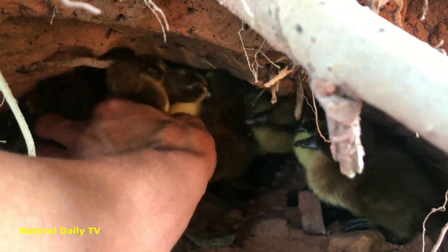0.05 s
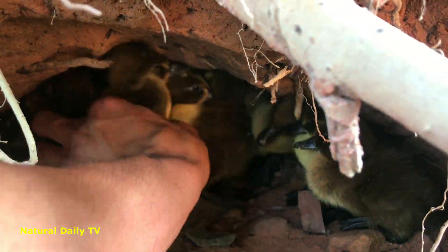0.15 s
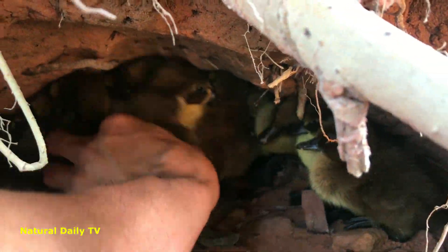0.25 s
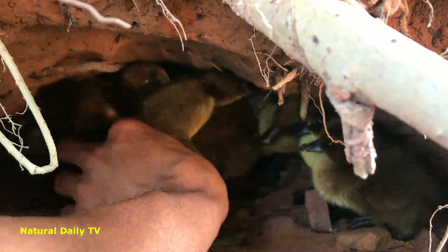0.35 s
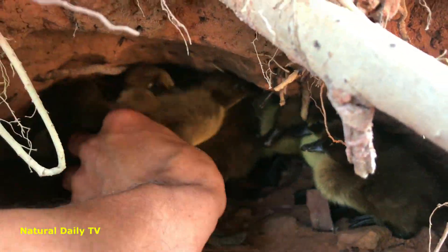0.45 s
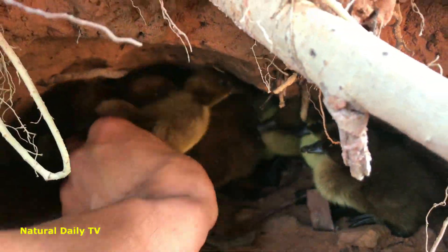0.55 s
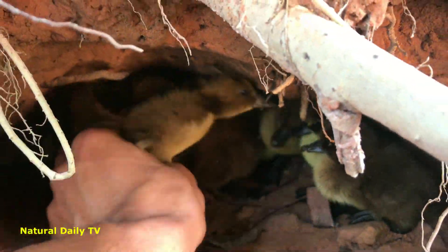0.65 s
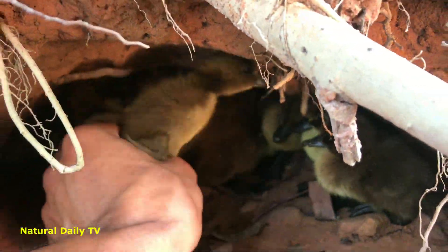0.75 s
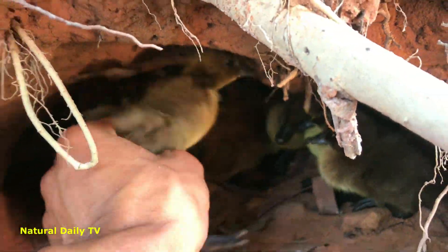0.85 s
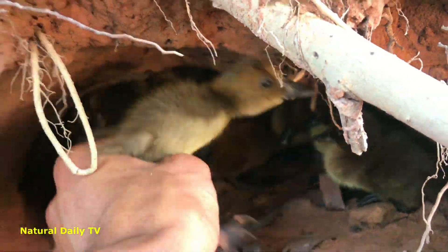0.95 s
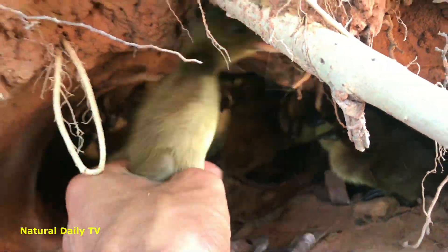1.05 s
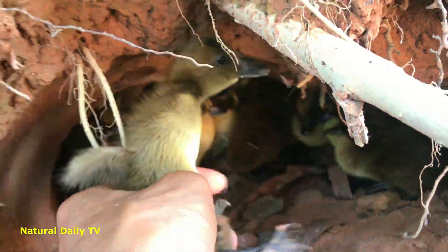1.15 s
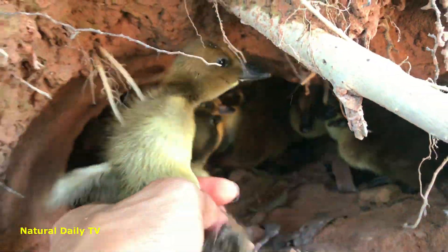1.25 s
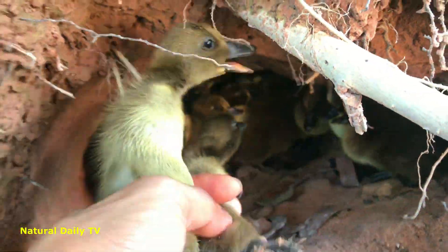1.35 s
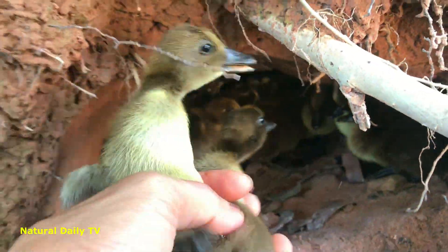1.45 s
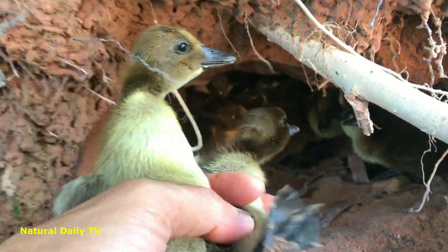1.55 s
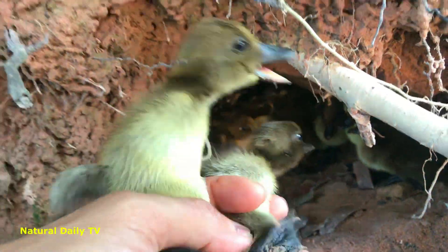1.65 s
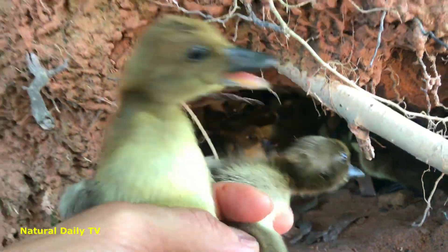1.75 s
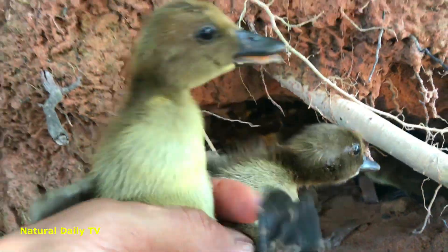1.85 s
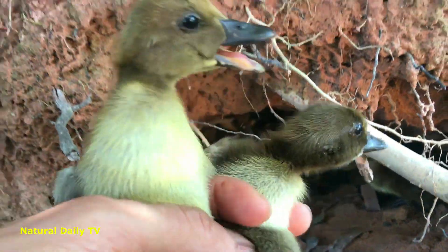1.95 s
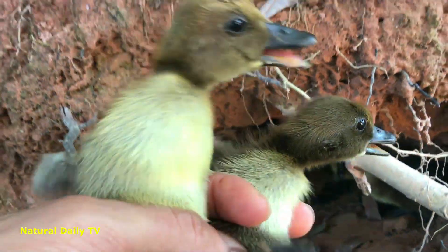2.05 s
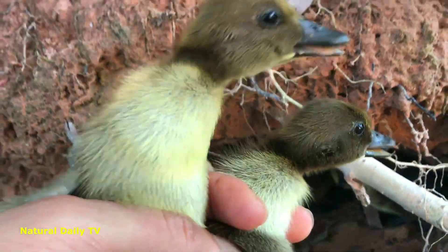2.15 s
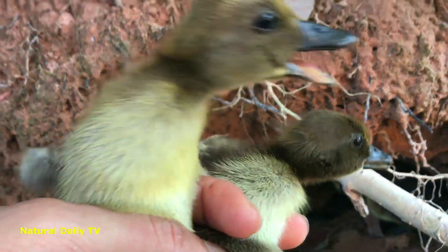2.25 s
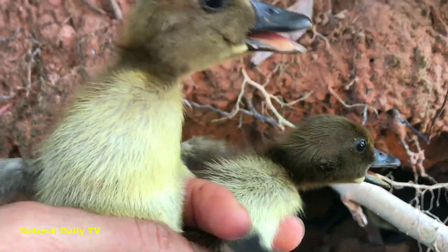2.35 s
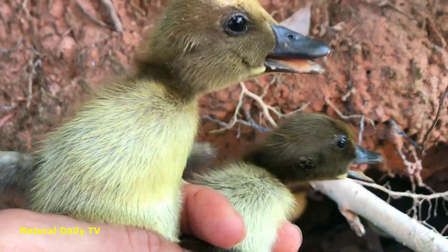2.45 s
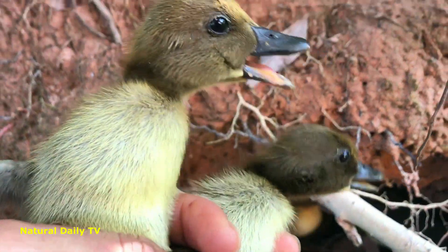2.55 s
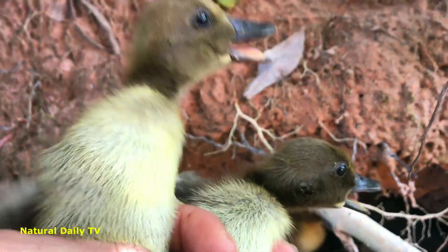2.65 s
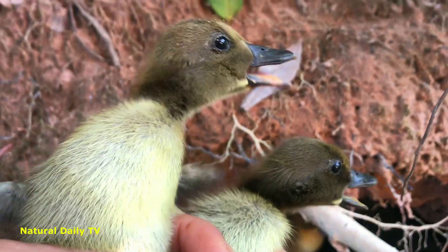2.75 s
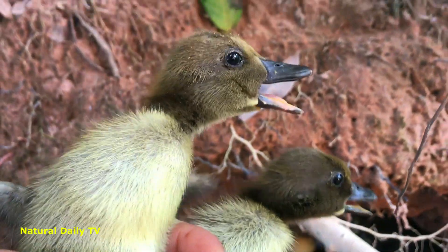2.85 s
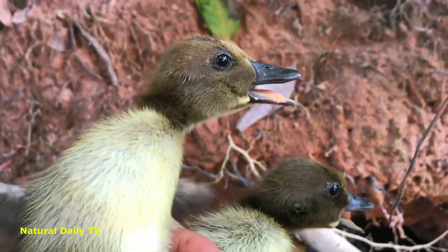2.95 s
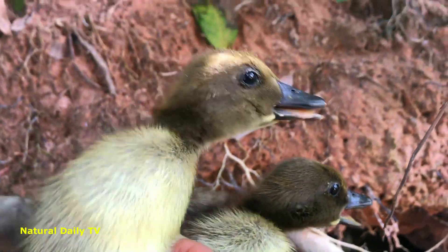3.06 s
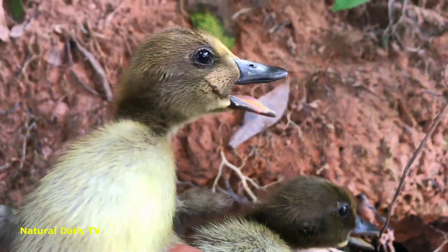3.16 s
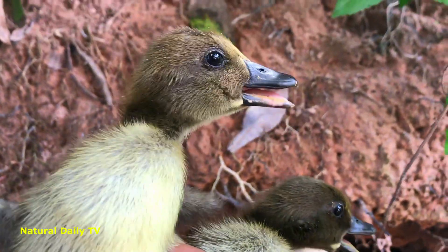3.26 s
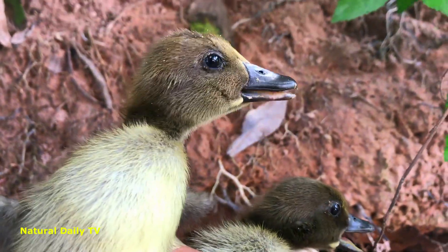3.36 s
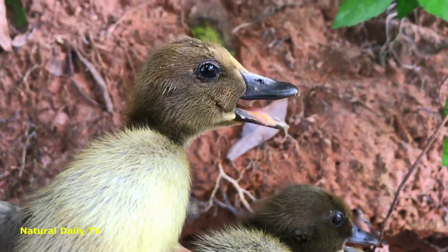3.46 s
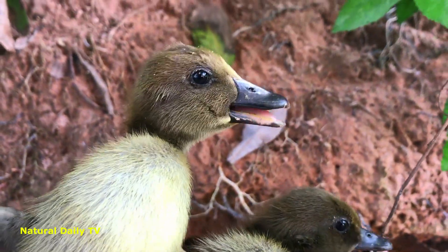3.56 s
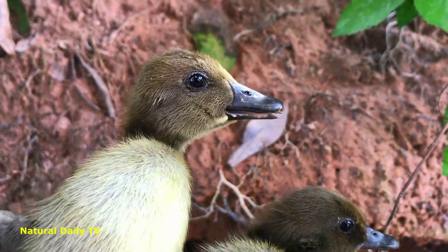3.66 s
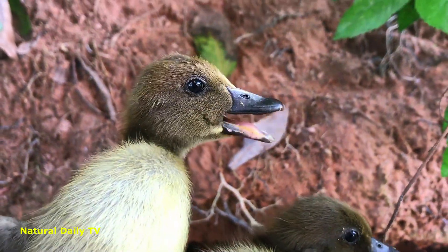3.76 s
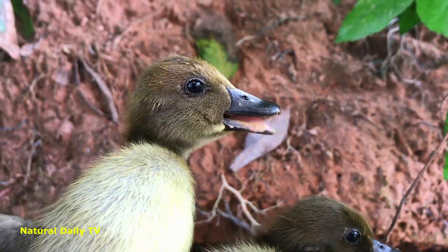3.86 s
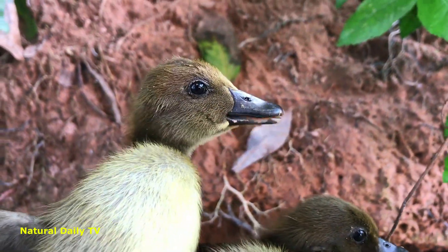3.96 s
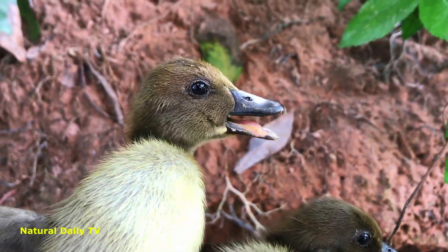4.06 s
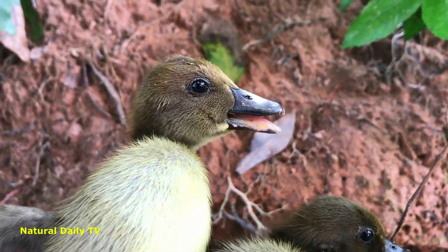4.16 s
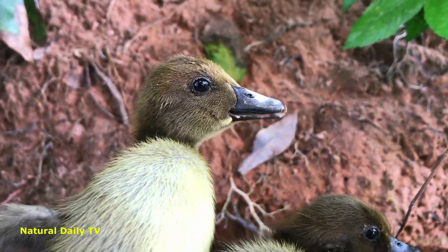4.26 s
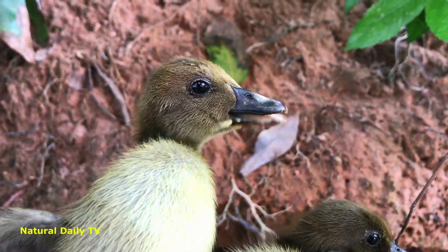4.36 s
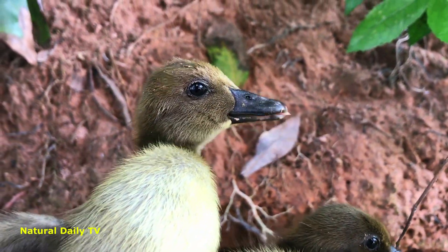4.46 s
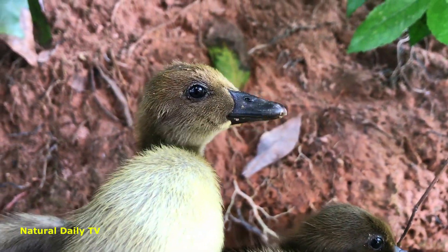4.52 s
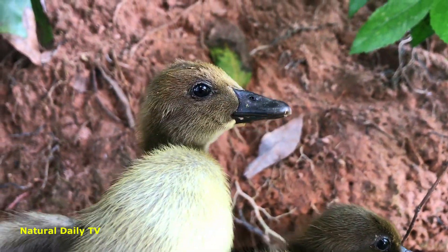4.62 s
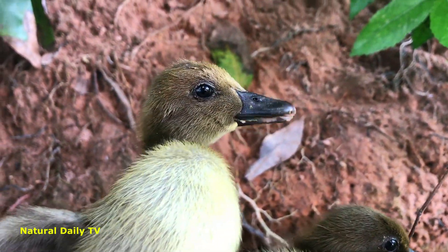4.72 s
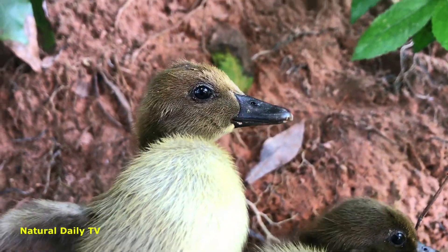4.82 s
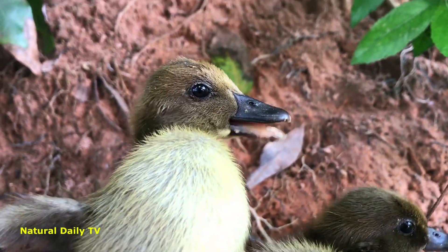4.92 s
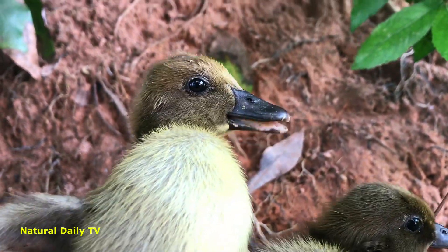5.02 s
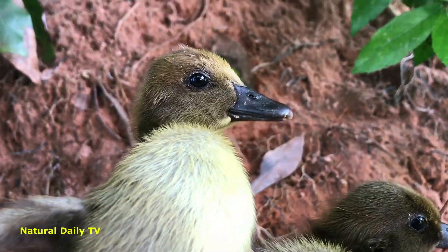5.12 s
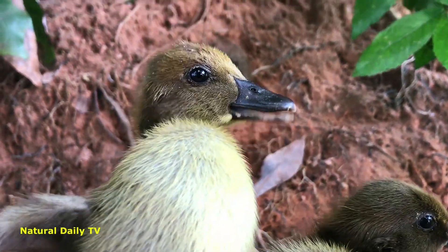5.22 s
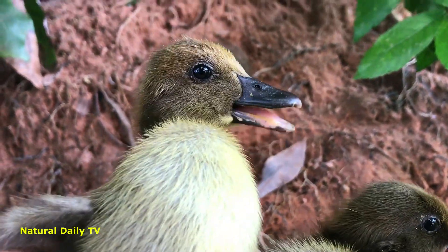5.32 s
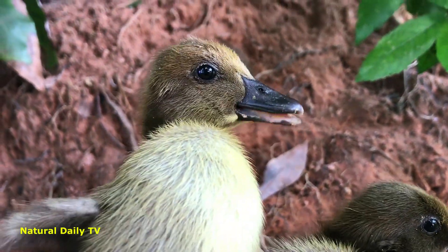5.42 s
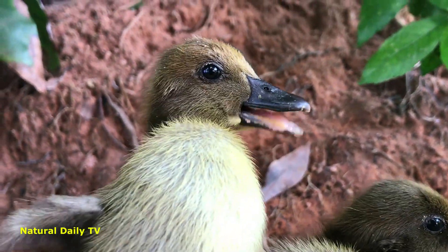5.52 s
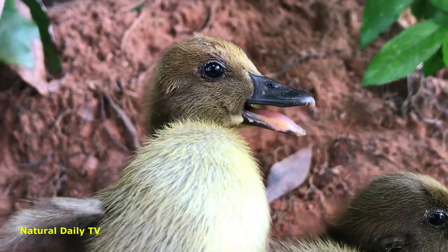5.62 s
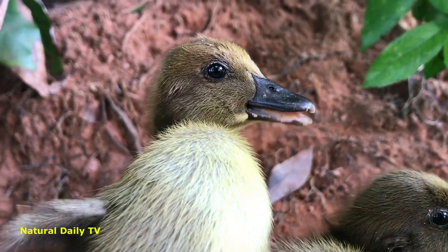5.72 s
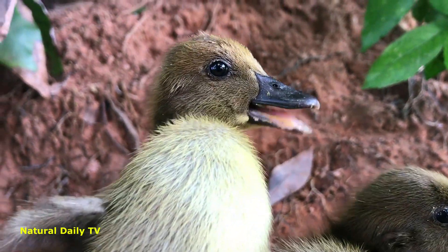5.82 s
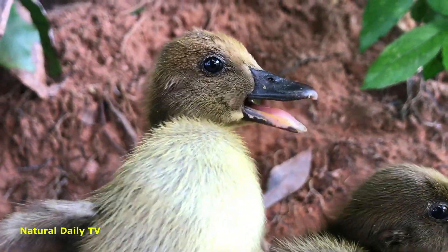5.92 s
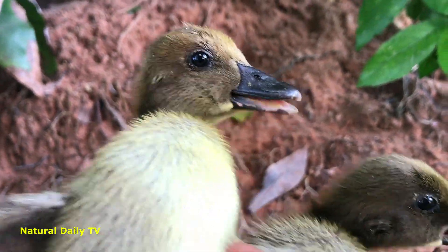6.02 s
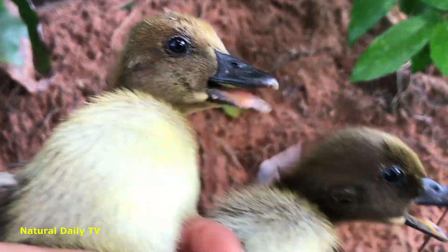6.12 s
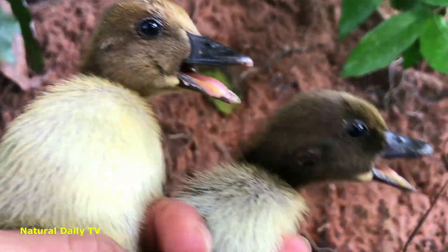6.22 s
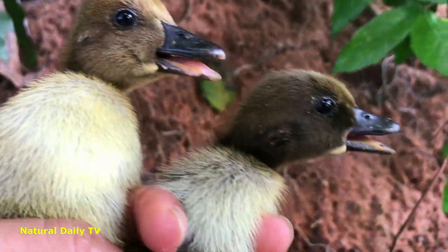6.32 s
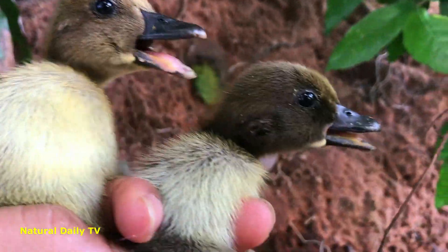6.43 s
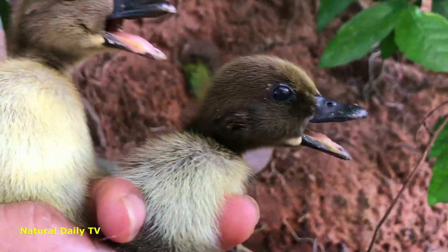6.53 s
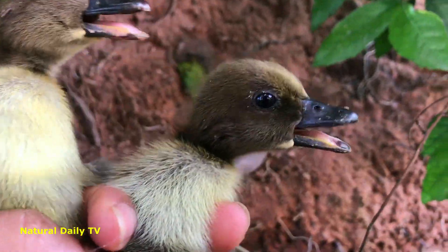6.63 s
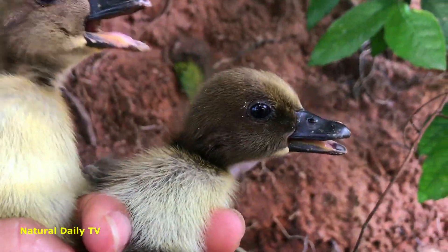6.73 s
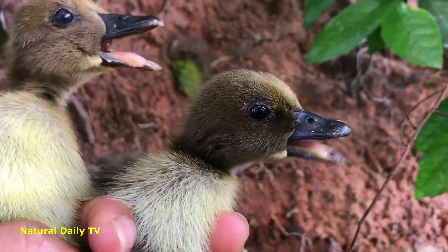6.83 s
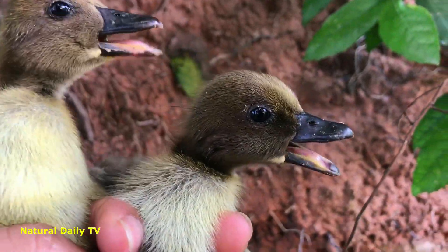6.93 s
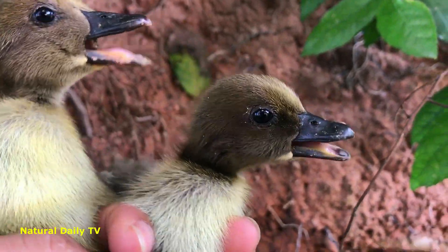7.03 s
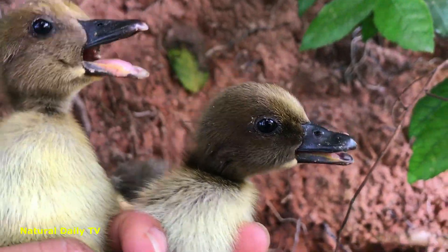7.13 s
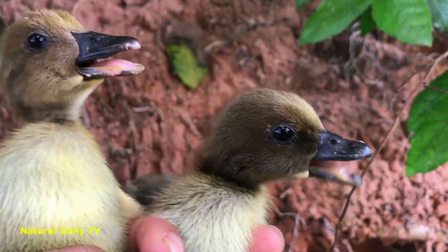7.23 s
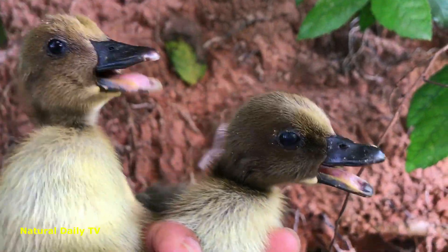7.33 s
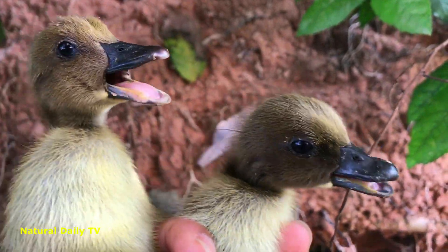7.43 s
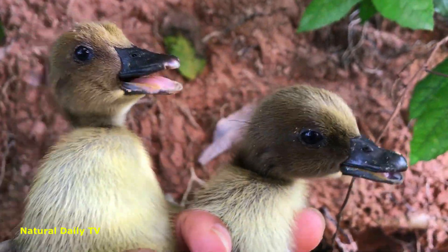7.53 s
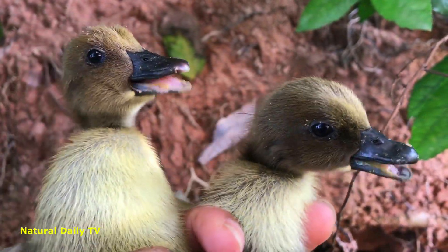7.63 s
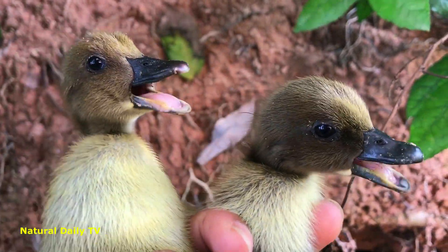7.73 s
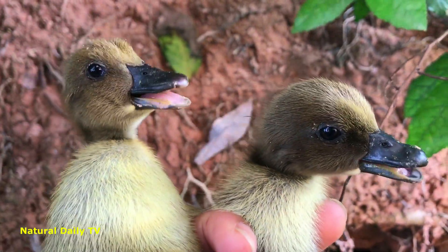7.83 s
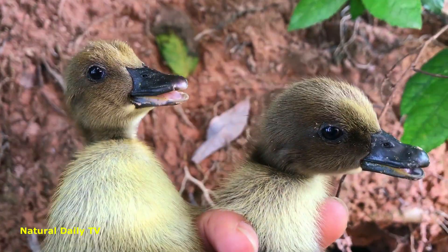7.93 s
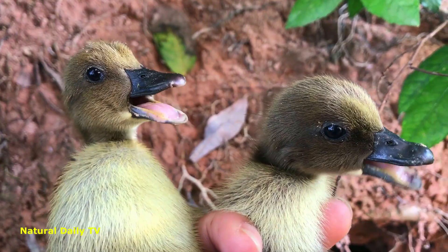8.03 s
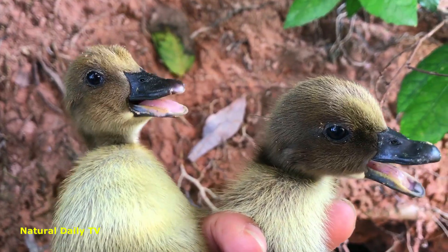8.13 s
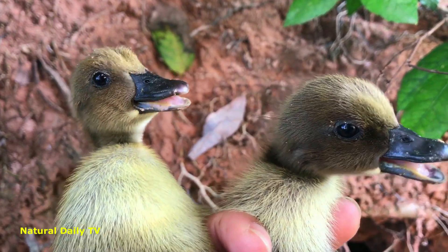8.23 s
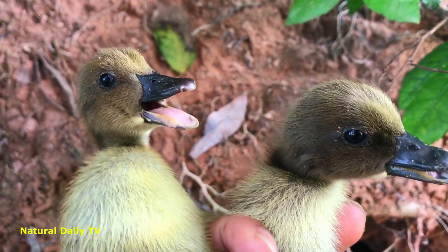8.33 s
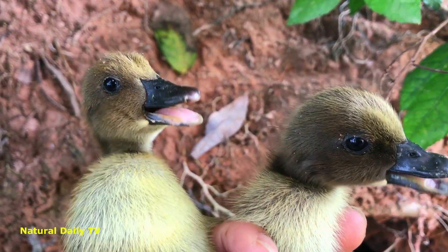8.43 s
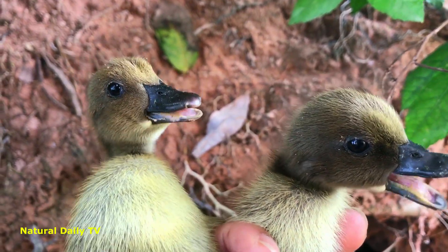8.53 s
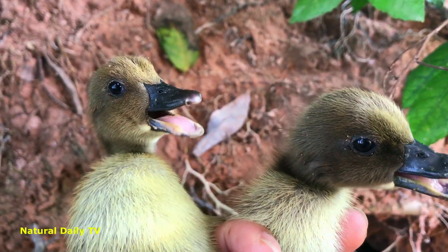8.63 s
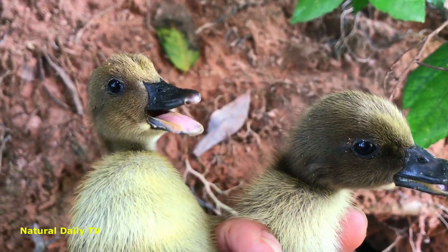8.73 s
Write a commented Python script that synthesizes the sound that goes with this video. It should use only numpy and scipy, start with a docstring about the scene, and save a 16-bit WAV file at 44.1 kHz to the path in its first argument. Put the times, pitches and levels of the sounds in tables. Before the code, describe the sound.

Soft piping from a burrow and a brush of dry soil give way to two ducklings' loud, insistent, scratchy-edged peeps.

```python
"""Two ducklings, lifted out of a burrow in an earth bank, peep close to the microphone, in turns and then
together. Each peep is a whistle with harmonics and hiss that breaks into a rasp and ends in a quick downward
slide. Others pipe softly in the burrow as sinking arches of tone, and a rising sweep made the same way leads
into the lower duckling's first peep; bills tick as short noise bursts. Shaped noise makes the open air and the
soil under a hand; the woods ring faintly, two hums waver far off, and a distant engine, a stack of firing
lines, slows and fades."""
import sys
import numpy as np
from scipy import signal
from scipy.fft import rfft, irfft
from scipy.io import wavfile
from scipy.ndimage import uniform_filter1d, map_coordinates

SR = 44100
rng = np.random.default_rng(int(sys.argv[2]) if len(sys.argv) > 2 else 0)


def put_to_file(sound):
    """Save the sound as 16-bit audio at rate SR, in the file named by the first command-line argument."""
    columns = np.atleast_2d(sound).T  # one column per channel
    safe = np.clip(columns, -1, 1)
    whole_steps = np.round(safe * 32767)
    wavfile.write(sys.argv[1], SR, whole_steps.astype(np.int16))


N = 387198
TIME = np.arange(N) / SR


def undb(db):
    """Decibels to gain."""
    return 10 ** (np.asarray(db) / 20)


def unit(x):
    """Scale to rms 1."""
    return x / np.sqrt(np.mean(x ** 2) + 1e-18)


def colour(x, points):
    """Filter by a (frequency [Hz], level [dB]) spectrum; rms 1."""
    hz, db = np.transpose(points)
    f = np.arange(len(x) // 2 + 1) * SR / len(x)
    gain = undb(np.interp(np.log(f + 1), np.log(hz), db))
    return unit(irfft(rfft(x) * gain, len(x)))


def wander(t, rate):
    """Random levels, rate a second, joined smoothly; spread near 1."""
    points = rng.standard_normal(2048)
    return map_coordinates(points, [(t - t[0]) * rate], order=2, mode="wrap")


def lumpy(x, lump_db, size=256):
    """Narrow bands swell and sink on their own for some milliseconds, as in unsteady turbulence."""
    spectrum = signal.stft(x, nperseg=size)[2]
    lumps = rng.standard_normal(spectrum.shape)
    lumps = uniform_filter1d(lumps, size=3, axis=0)
    lumps = unit(uniform_filter1d(lumps, size=4, axis=1))
    spectrum = spectrum * undb(lump_db * np.clip(lumps, -2, 2))
    return unit(signal.istft(spectrum, nperseg=size)[1][:len(x)])


def gate(t, on, off, rise, fall):
    """Smooth opening centred on one moment and closing centred on another."""
    return (1 + np.tanh((t - on) / rise)) * (1 - np.tanh((t - off) / fall)) / 4


def span(start, end):
    """The samples of a call, with a 20 ms margin on each side."""
    return slice(max(int((start - .02) * SR), 0), min(int((end + .02) * SR), N))


def tone(phase):
    """Sine of rms 1."""
    return np.sqrt(2) * np.sin(phase)


def turn(hz):
    """Phase of a moving pitch."""
    return 2 * np.pi * np.cumsum(hz) / SR


def reedy(phase, second_db, third_db):
    """A tone with its second and third harmonics."""
    return tone(phase) + undb(second_db) * tone(2 * phase) + undb(third_db) * tone(3 * phase)


# open-air spectrum: (frequency [Hz], relative level [dB per Hz])
AIR_SPECTRUM = [(20, -20), (45, 0), (65, 3.5), (120, 1), (200, -8.5), (450, -14.5), (900, -14.5),
                (2000, -24), (4000, -17), (8000, -29.5), (16000, -48)]
AIR_START_DB, AIR_DB_PER_S = -58, -0.48


def open_air():
    """Coloured noise that wavers and grows slowly quieter."""
    level_db = AIR_START_DB + AIR_DB_PER_S * TIME + wander(TIME, 6.0)
    return colour(rng.standard_normal(N), AIR_SPECTRUM) * undb(level_db)


# faint far-off hums: (frequency [Hz], level [dB])
HUMS = [(570, -82), (820, -80)]


def far_hums():
    """Tones unsteady in pitch, slowly wavering in level."""
    out = np.zeros(N)
    for hz, db in HUMS:
        phase = turn(hz * (1 + 0.01498 * wander(TIME, 40)))
        out += undb(db + 1.9 * wander(TIME, 2.424)) * tone(phase)
    return out


ENGINE_START_HZ, ENGINE_IDLE_HZ, ENGINE_SLOWING_S = 140.7, 90.7, 2.9
ENGINE_NEAREST_DB, ENGINE_PASSES_S, ENGINE_NEAR_S = -59, 1.5, 1.3


def far_engine():
    """Firing lines sink towards idle; loudest as the engine passes, weaker with distance either side."""
    firing_hz = ENGINE_IDLE_HZ + (ENGINE_START_HZ - ENGINE_IDLE_HZ) * np.exp(-TIME / ENGINE_SLOWING_S)
    phase = turn(firing_hz * (1 + 0.018 * wander(TIME, 3.7)))
    engine = np.zeros(N)
    for k, db in ((.5, -2), (1, 0), (1.5, -14), (2, -19), (3, -16)):  # (multiple of firing rate, dB)
        engine += undb(db + 2 * wander(TIME, 15)) * tone(k * phase)
    distance = np.hypot(1, (TIME - ENGINE_PASSES_S) / ENGINE_NEAR_S)  # 1 at the nearest
    return engine * undb(ENGINE_NEAREST_DB) / distance ** 1.1


# colour of the crumbling soil: (frequency [Hz], relative level [dB per Hz])
SOIL_SPECTRUM = [(200, -22), (1000, 15.5), (3500, -7), (7000, -3), (12000, 2), (16000, -35.5)]
REACH_FROM_S, REACH_TO_S, REACH_DB, STILL_DB = 0.37, 1.9, -67.5, -76.5


def soil_rustle():
    """Spiky noise: a hand brushes dry soil and roots reaching into the burrow, then lies almost still."""
    spikes_db = 4.5 * np.minimum(rng.exponential(size=N), 7)
    crumbs = colour(rng.standard_normal(N) * undb(spikes_db), SOIL_SPECTRUM)
    brushing = undb(STILL_DB) + undb(REACH_DB) * gate(TIME, REACH_FROM_S, REACH_TO_S, 0.14, 0.13)
    return crumbs * brushing * undb(2.38 * wander(TIME, 52))


# soft peeps: (crest time [s], fall length [s], crest pitch [Hz], drop [Hz], level [dB]); the row at .352 s,
# with a negative drop, is a rising sweep that leads into the lower duckling's first peep
BURROW_PEEPS = [(0, .092, 3340, 1504, -44), (0.197, .071, 3424, 1090, -42), (0.299, .038, 3270, 500, -53.5),
                (.352, .04, 3200, -500, -41), (0.627, 0.048, 3190, 700, -52),
                (0.907, .072, 3710, 1410, -54), (0.961, .058, 3230, 400, -52.5),
                (1.086, 0.042, 4430, 600, -63), (1.185, .057, 3100, 900, -49.5),
                (1.296, .077, 3100, 650, -54), (1.68, .065, 3440, 1060, -53),
                (1.915, .047, 2720, 900, -56.5), (2.005, .095, 3620, 1400, -53.5),
                (2.346, .054, 3380, 440, -49.5), (5.779, .041, 2960, 1100, -60),
                (6.1, 0.058, 3000, 1108, -68.5), (6.735, .05, 3060, 800, -61),
                (7.92, .04, 2980, 750, -58.5), (8.057, .03, 4470, 750, -51.5)]
FULL_RISE_S, FULL_RISE_HZ, FULL_DB = .022, 1040, -41.5  # lift to a crest at full level


def burrow():
    """Soft contact peeps: arches that sink away; softer ones lift less and are purer.

    A row with a negative drop keeps rising instead: the sweep into the lower duckling's first peep."""
    out = np.zeros(N)
    for crest, length, crest_hz, drop_hz, db in BURROW_PEEPS:
        effort = undb(db - FULL_DB)
        rise_s = FULL_RISE_S * np.sqrt(effort)
        start, end = crest - rise_s, crest + length
        part = span(start, end)
        t = TIME[part]
        before = np.clip((crest - t) / rise_s, 0, 1.2)
        after = np.clip((t - crest) / length, 0, 1.2)
        hz = crest_hz - FULL_RISE_HZ * effort ** 2 * before ** 1.7 - drop_hz * after ** 1.1
        second_db = -16 + .9 * (db + 40)
        y = reedy(turn(hz * (1 + 0.02 * wander(t, 150))), second_db, second_db - 6.0)
        level_db = db - 11 * (before ** 2 + after ** 2) + 1.1 * wander(t, 130)
        out[part] += y * undb(level_db) * gate(t, start + 0.0016, end - .004, .003, .004)
    return out


def woods(x, t60_s, echo_db):
    """Scattered echo from bank, trunks and leaves: convolution with decaying noise."""
    t = TIME[:SR]
    tail = rng.standard_normal(SR) * np.exp(-np.log(1000) * t / t60_s) * (t > .004)
    return undb(echo_db) * signal.fftconvolve(x, tail / np.sqrt(np.sum(tail ** 2)))[:N]


def lead_in(t, start, rest_hz, lead_db):
    """A faint reedy upward chirp as the membranes tighten before the whistle."""
    progress = np.clip((t - start) / .018 + 1, 0, 1)
    hz = rest_hz * (1 - 0.36 * (1 - progress) ** 2)
    phase = turn(hz * (1 + 0.074 * wander(t, 2000)))
    return reedy(phase, -10, -18) * undb(lead_db) * np.sin(np.pi * progress)


# resonances and a notch of the open bill: (centre [Hz], half width [Hz], level [dB])
BILL_RESONANCES = [(8430, 150, 7), (9660, 700, -2.5), (11165, 560, 6)]


def bill_db(hz):
    """How much the bill lifts or sinks an overtone at this frequency."""
    return sum(db / (1 + ((hz - centre_hz) / width_hz) ** 2)
               for centre_hz, width_hz, db in BILL_RESONANCES)


USUAL_PEEP_DB, OVERTONE_SLOPE = -25, 0.74  # harmonics vary less from peep to peep than the fundamental


def whistle(t, row, voice, catches, sublines, hiss):
    """Strong fundamental, weak harmonics, sub-lines once the pressure is up, and hissing air."""
    start, crack, _, held_hz, climb_hz, peep_db, swell_db, hoarse_db, _ = row
    age = np.maximum(t - start, 0)
    progress = np.minimum(age / (crack - start), 1)

    # pitch settles quickly, then climbs as pressure builds towards the break
    scoop_hz = min(voice["scoop"] * (voice["rest_hz"] - held_hz), voice["hook_hz"])
    hz = held_hz + scoop_hz * np.exp(-age / voice["settle_s"])
    hz = hz + climb_hz * progress ** voice["climb_power"]

    shape_db = voice["onset_db"] * np.exp(-age / voice["attack_s"])
    shape_db = shape_db + swell_db * (progress - .5) + voice["droop_db"] * progress ** 4
    level_db, effort_db = peep_db + shape_db, .5 * shape_db
    overtone_db = USUAL_PEEP_DB + OVERTONE_SLOPE * (peep_db - USUAL_PEEP_DB) + effort_db
    for at, width, rise_hz, dip_db in catches:
        bump = np.exp(-((t - at) / width) ** 2)
        hz, level_db = hz + rise_hz * bump, level_db + dip_db * bump

    # the more air against tone, the more flutter
    flutter = np.clip(undb(hoarse_db - level_db + voice["flutter_db"]), .1, 1.5)
    phase = turn(hz * (1 + voice["jitter"] * (wander(t, 84.0) + flutter * wander(t, 450))))
    shimmer_db = voice["shimmer_db"] * (wander(t, 46.5) + flutter * wander(t, 300))
    y = undb(level_db + shimmer_db) * tone(phase)
    for k, db in ((2, voice["second_db"]), (3, voice["third_db"]), (4, voice["third_db"] - 14)):
        y += undb(overtone_db + db + bill_db(k * hz) + 2.5 * wander(t, 60)) * tone(k * phase)

    locked = gate(progress, 0.34, 2, 0.13, 0.66)
    locked = locked * undb(hoarse_db + voice["sub_db"] + 2 * wander(t, 86.4))
    slip = voice["smear"] * wander(t, 351)  # the long period keeps losing step
    y += locked * sum(undb(db + bill_db(k * hz)) * tone(k * phase + slip) for k, db in sublines)

    # turbulence is strongest at the onset and just before the break
    strain_db = np.interp(progress, [.11, .4, .55, 1], [9.5, -17, -0.5, 5.5])
    y += hiss * undb(hoarse_db + voice["hiss_db"] + strain_db + effort_db + 2 * wander(t, 304))
    return y * gate(t, start + .002, crack + .002, .0035, .003)


def rasp(t, crack, end, top_hz, rasp_db, voice, air, hop_s=.0065, fade_db=5, under_db=-16):
    """Chaotic membranes: sagging scraps hop between the pitch and a throat line, over half pitch and air."""
    stop = max(end - .013, crack + 0.0024)
    hops = np.maximum((t - t[0]) / hop_s + .3 * wander(t, 100), 0)
    choice, detune, size = rng.random((256, 3))[hops.astype(int) % 256].T
    hz = top_hz * (.98 + .1 * detune) * (1.04 - .08 * (hops % 1))  # each scrap sags
    phase = turn(uniform_filter1d(hz, size=40) * (1 + .045 * wander(t, 3000)))
    upper = uniform_filter1d(1. * (choice < voice["upper_share"]), size=60)
    scraps = (1 - .7 * upper) * reedy(phase, -17, -22)
    scraps += (.2 + .8 * upper) * reedy(phase * 5900 / top_hz, -16, -30)  # near a throat resonance
    scraps += undb(under_db) * tone(phase / 2)
    scraps *= uniform_filter1d(undb(12 * size - 9), size=60)
    bursts = air * undb(voice["air_db"] + 3 * wander(t, 300))
    fading = fade_db * np.clip((t - crack) / (stop - crack) - .5, -.5, .5)
    return (scraps + bursts) * undb(rasp_db - fading) * gate(t, crack + 0.00041, stop, 0.0043, 0.0069)


def slide(t, end, top_hz, slide_db, end_hz=1850):
    """The membranes go slack: the pitch drops ever faster and the tone dies on the way."""
    length = 0.02 * rng.uniform(0.48, 1.25)
    progress = np.clip((t - end + length) / length, 0, 1)
    hz = end_hz + (1.04 * top_hz - end_hz) * (1 - progress ** 1.776)
    phase = turn(hz * (1 + 0.017 * wander(t, 398.3) + .035 * wander(t, 2500)))
    y = reedy(phase, -17, -27)
    return y * undb(slide_db + 2 * wander(t, 307.7)) * np.sin(np.pi * progress) ** 2


# air hissing past a clear whistle: (frequency [Hz], relative level [dB])
HISS_SPECTRUM = [(400, -61.5), (1000, -24.5), (1600, -20), (2400, -16.5), (3200, -8.5), (4500, -2.5),
                 (5200, -1), (6100, -2), (7300, -6.5), (8500, -18), (10000, -26.5), (11500, -18.5),
                 (13500, -21), (16000, -23)]
# throat and bill colour of the rasp's air: (frequency [Hz], relative level [dB])
THROAT_SPECTRUM = [(400, -53.5), (900, -27), (1500, -22), (2300, -16.5), (3300, -11.5), (4500, -1.5),
                   (5100, -5), (5900, 2.5), (7000, -12.5), (7900, -16), (10000, -16.5), (11300, -11),
                   (13500, -24.5), (16000, -23)]


def duckling(peeps, voice, catches, sublines):
    """Each peep: a faint upward chirp, the whistle, the rasp, the slide."""
    out = np.zeros(N)
    hiss = colour(lumpy(rng.standard_normal(N), 5), HISS_SPECTRUM)
    air = colour(lumpy(rng.standard_normal(N), 5), THROAT_SPECTRUM)
    for row in peeps:
        start, crack, end, held_hz, climb_hz, peep_db, _, _, rasp_db = row
        part = span(start, end)
        t, top_hz = TIME[part], held_hz + climb_hz
        out[part] += lead_in(t, start, voice["rest_hz"], peep_db + voice["lead_db"])
        out[part] += whistle(t, row, voice, catches, sublines, hiss[part])
        out[part] += rasp(t, crack, end, top_hz, rasp_db, voice, air[part])
        out[part] += slide(t, end, top_hz, rasp_db + voice["slide_db"])
    return out


# peeps: (start [s], break into rasp [s], end [s], held pitch [Hz], late climb [Hz], level [dB],
#   swell over the whistle [dB], hoarseness [dB], rasp level [dB])
LOW_PEEPS = [(.374, .396, 0.456, 3470, 593.5, -50, 6, -51, -40.5),
             (.458, .469, .493, 4200, -9, -55, -2, -70, -44.5),
             (.766, .802, .868, 3690, 0, -34, 22, -52, -38.5),
             (1.126, 1.158, 1.21, 3920, -170, -40.5, 2, -41.5, -40.5),
             (1.447, 1.495, 1.556, 4170, 191.5, -23.5, 2.5, -42, -29),
             (1.755, 1.822, 1.865, 4346, -95, -18.5, 0, -40, -31.5),
             (2.035, 2.1, 2.161, 4020, 141.5, -23.5, -13, -41.5, -30),
             (2.323, 2.415, 2.44, 4037, 221.5, -20, -6.5, -44.5, -29),
             (2.615, 2.716, 2.743, 3940, 210, -26, 0, -36.5, -33),
             (2.905, 2.995, 3.021, 3778, 170, -23.5, -6, -48, -35.5),
             (3.193, 3.268, 3.298, 3913, 105, -25, 3, -46.5, -31.5),
             (3.526, 3.62, 3.644, 3822, 82, -24.5, 3.5, -48, -33),
             (3.827, 3.925, 3.952, 3656, 169.5, -24.5, -8.5, -60, -34),
             (4.132, 4.228, 4.257, 3665, 123, -25, 0, -53.5, -33),
             (4.462, 4.53, 4.55, 3573, 1, -25.5, -16.5, -50.5, -45),
             (5.02, 5.047, 5.075, 3790, -76.5, -19.5, -8, -43.5, -41),
             (5.335, 5.43, 5.468, 3510, -16, -25.5, -4.5, -48, -39.5),
             (5.628, 5.735, 5.755, 3570, 137, -27, -4.5, -67, -34.5),
             (5.925, 6.025, 6.053, 3660, 107, -26.5, 3, -51, -32),
             (6.23, 6.335, 6.357, 4010, 149, -21.5, 2.5, -48.5, -28.5),
             (6.523, 6.635, 6.659, 4165, 108, -20.5, -1, -43.5, -28),
             (6.826, 6.943, 6.965, 4203, 138.5, -20.5, -1.5, -44.5, -27.5),
             (7.138, 7.243, 7.28, 4045, 32.5, -20.5, 5.5, -44, -36),
             (7.455, 7.548, 7.583, 4187, 37.5, -20.5, -4.5, -44, -31),
             (7.765, 7.862, 7.896, 3987, 213, -19, 1.5, -43.5, -30),
             (8.088, 8.19, 8.218, 3970, 95, -20.5, -3, -35.5, -33),
             (8.4, 8.497, 8.533, 4010, 132, -19.5, 1.5, -40.5, -31),
             (8.718, 8.78, 8.84, 3970, -36, -22.5, 2, -50, -28)]
# voice, by key: rest_hz [Hz], scoop [ratio], hook_hz [Hz], settle_s [s], climb_power [exponent],
#   onset_db [dB], attack_s [s], droop_db [dB], jitter [fraction of pitch], shimmer_db [dB], smear [rad],
#   flutter_db [dB], upper_share [fraction of scraps]; second_db, third_db, lead_db [dB re whistle];
#   sub_db, hiss_db [dB re hoarseness]; air_db, slide_db [dB re rasp].
#   Peeps held above rest_hz scoop up to their pitch, those below hook down.
LOW_TRAITS = dict(rest_hz=3800, scoop=1.3, hook_hz=150, settle_s=.019, climb_power=2.2, onset_db=-11, attack_s=.009, droop_db=-1.5, second_db=-18, third_db=-17.5, jitter=.002, shimmer_db=1.3, smear=.13, sub_db=0, hiss_db=-4, lead_db=-34, slide_db=-.5, flutter_db=4, upper_share=.2, air_db=1)
# lines between harmonics as the period doubles: (multiple of pitch [ratio], level [dB])
DOUBLED_LINES = [(.5, -13), (1.5, 0), (2.5, -6), (3.5, -9)]


def low_duckling():
    """The lower voice: its period doubles when hoarse."""
    return duckling(LOW_PEEPS, LOW_TRAITS, [], DOUBLED_LINES)


# peeps: (start [s], break into rasp [s], end [s], held pitch [Hz], late climb [Hz], level [dB],
#   swell over the whistle [dB], hoarseness [dB], rasp level [dB])
HIGH_PEEPS = [(2.103, 2.218, 2.233, 4583, -38.5, -24, -1.5, -43, -41),
              (2.448, 2.555, 2.584, 4655, 253, -29, 6, -42.5, -35),
              (2.768, 2.85, 2.902, 4590, 36, -25.5, 2, -44.5, -40),
              (3.058, 3.15, 3.192, 4224, 304, -28, 7, -48.5, -39.5),
              (3.356, 3.455, 3.488, 4150, 263.5, -27, 0.5, -50, -38.5),
              (3.65, 3.76, 3.789, 4130, 232.5, -26.5, -3.5, -53, -38.5),
              (3.958, 4.06, 4.095, 4130, 202, -26.5, 1, -51, -37),
              (4.258, 4.36, 4.406, 4330, 200.5, -24.5, -5.5, -54.5, -39),
              (4.587, 4.684, 4.733, 4296, 266.5, -25, -10, -57, -38),
              (4.903, 5.04, 5.126, 4453, 16.5, -29.5, -19.5, -52.5, -36),
              (5.228, 5.352, 5.386, 4450, 107, -21.5, -3.5, -51.5, -35),
              (5.555, 5.682, 5.713, 4450, 118.5, -25, 5, -49, -34.5),
              (5.88, 6.005, 6.045, 4450, 144.5, -20.5, -4, -49.5, -37),
              (6.212, 6.325, 6.371, 4495, -51, -19, -0.5, -46, -36),
              (6.585, 6.675, 6.725, 4420, 120.5, -19.5, -8.5, -48, -38),
              (6.96, 7.055, 7.103, 4637, -67.5, -18.5, 0.5, -41, -38.5),
              (7.355, 7.448, 7.479, 4686, -110, -13.5, -2, -38, -31.5),
              (7.768, 7.845, 7.89, 4460, 203, -17, 4, -35, -48),
              (8.158, 8.277, 8.308, 4704, -230, -16.5, -6.5, -40, -36),
              (8.575, 8.673, 8.713, 4544, 155.5, -17, -5.5, -41.5, -36)]
# voice: keys and units as in LOW_TRAITS
HIGH_TRAITS = dict(rest_hz=4300, scoop=1.1, hook_hz=110, settle_s=.017, climb_power=3.2, onset_db=-7, attack_s=.009, droop_db=-3, second_db=-26, third_db=-31, jitter=.0045, shimmer_db=1.65, smear=1.2, sub_db=-7, hiss_db=1.5, lead_db=-23, slide_db=-.5, flutter_db=14, upper_share=.3, air_db=2.5)
# catches, pitch flicks up and whistle thins: (time [s], half length [s], rise [Hz], level change [dB])
VOICE_CATCHES = [(2.161, 0.0056, 106, -18), (2.194, 0.0035, 60, -26), (5.287, 0.027, 51, -25),
                 (7.038, 0.0065, 225, -4.5), (7.398, 0.0042, 287, -15.5), (7.425, 0.0078, 374, -23)]
# lines between harmonics as the period triples: (multiple of pitch [ratio], level [dB])
TRIPLED_LINES = [(1 / 3, -16), (2 / 3, -5), (4 / 3, 0), (5 / 3, -7), (7 / 3, -13)]


def high_duckling():
    """The higher voice: its period triples when hoarse, and it catches now and then."""
    return duckling(HIGH_PEEPS, HIGH_TRAITS, VOICE_CATCHES, TRIPLED_LINES)


# bills clicking open: (time [s], level [dB])
CLICKS = [(2.308, -38.5), (3.816, -39.5), (4.121, -54), (4.465, -56), (4.565, -52), (5.329, -40.5),
          (7.702, -47), (8.076, -38.5), (8.391, -49)]


def bills():
    """Tiny broad ticks as a bill parts: noise decaying within milliseconds."""
    out = np.zeros(N)
    spectrum = [(200, -24), (900, 13.5), (4500, -4.5), (9000, -6.5), (16000, -16.0)]
    noise = colour(rng.standard_normal(N), spectrum)
    for at, db in CLICKS:
        part = span(at, at)
        age = TIME[part] - at
        out[part] += noise[part] * undb(db) * (age > 0) * np.exp(-abs(age) / .002)
    return out


def scene():
    """Both held ducklings, burrow and bills, with their echo, over the background."""
    background = open_air() + far_hums() + far_engine() + soil_rustle()
    voices = burrow() + low_duckling() + high_duckling() + bills()
    bank = woods(voices, t60_s=0.06, echo_db=-14)
    trees = woods(voices, t60_s=0.65, echo_db=-43.5)
    return (voices + bank + trees + background)[None]


TOP_HZ = 16000


def record(dry):
    """The recorder cuts the top: a steep elliptic low-pass."""
    return signal.sosfilt(signal.ellip(10, .2, 70, TOP_HZ, fs=SR, output="sos"), dry)


dry = scene()
out = record(dry)
put_to_file(out)
```